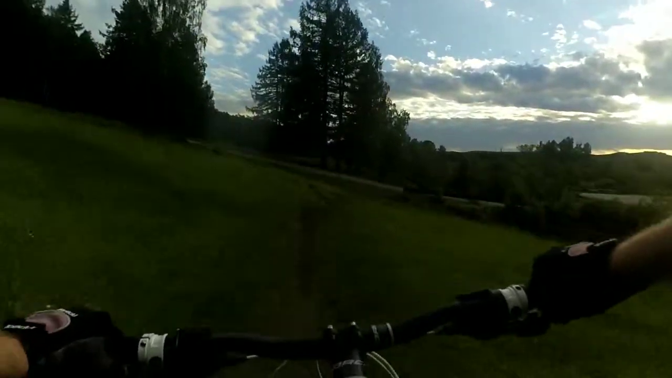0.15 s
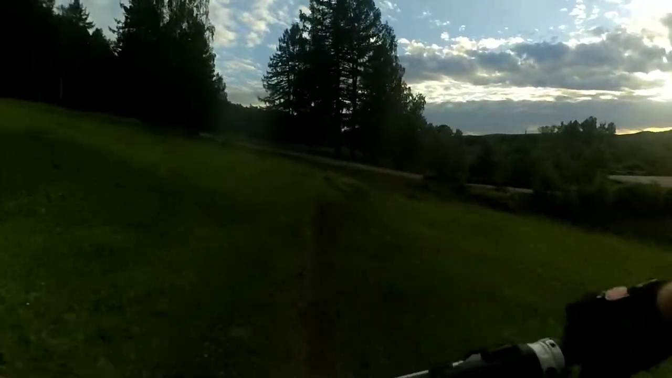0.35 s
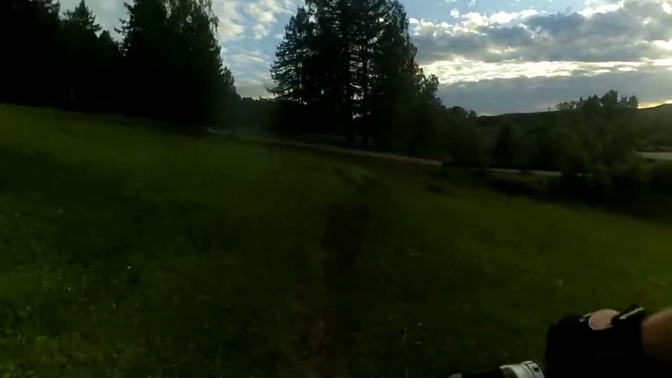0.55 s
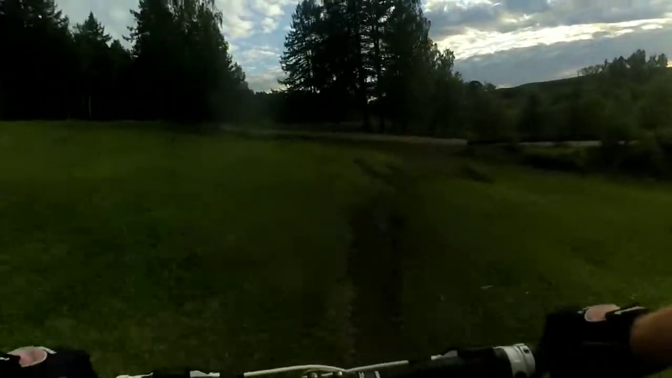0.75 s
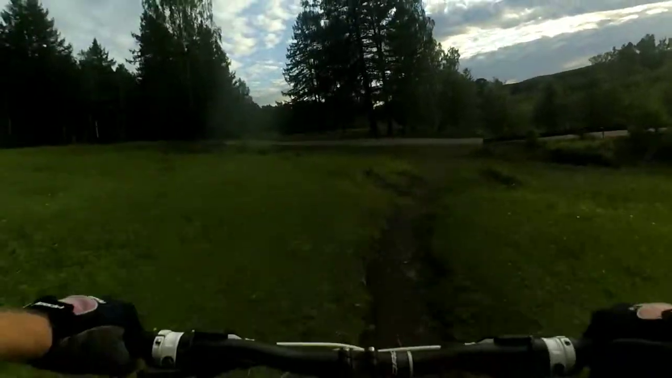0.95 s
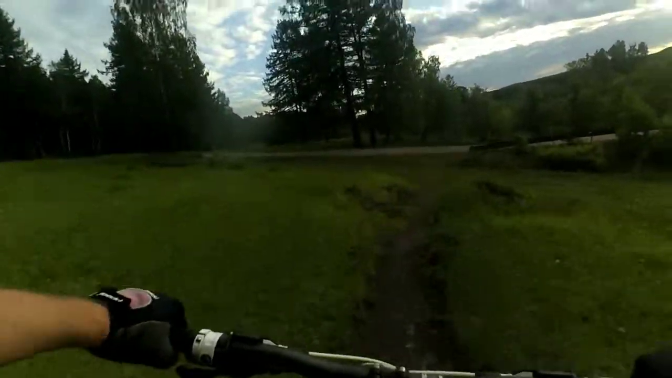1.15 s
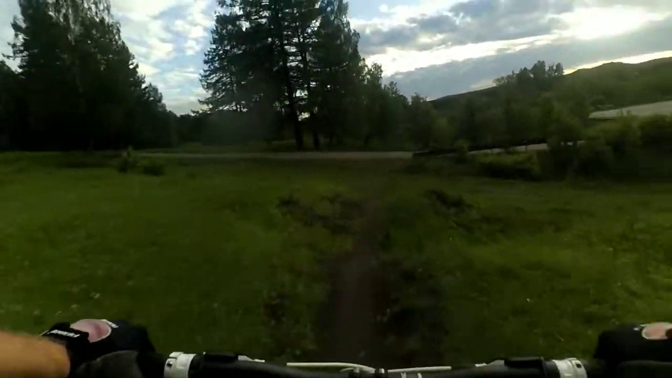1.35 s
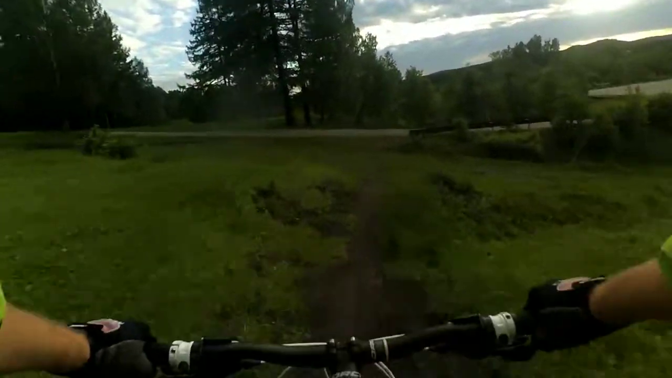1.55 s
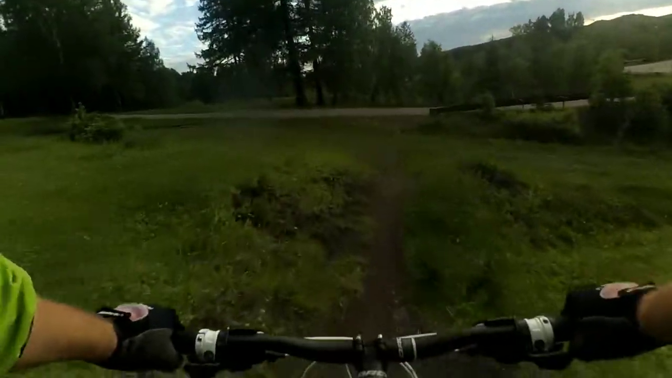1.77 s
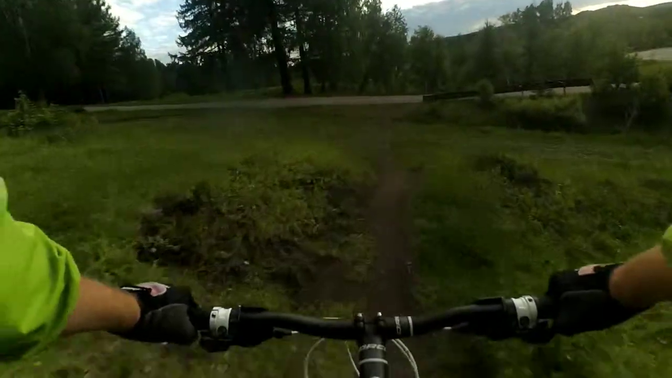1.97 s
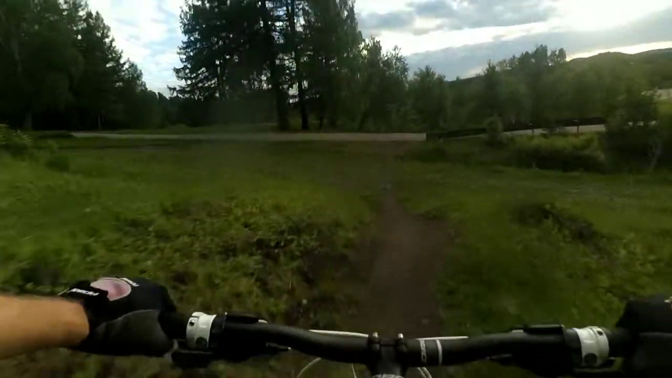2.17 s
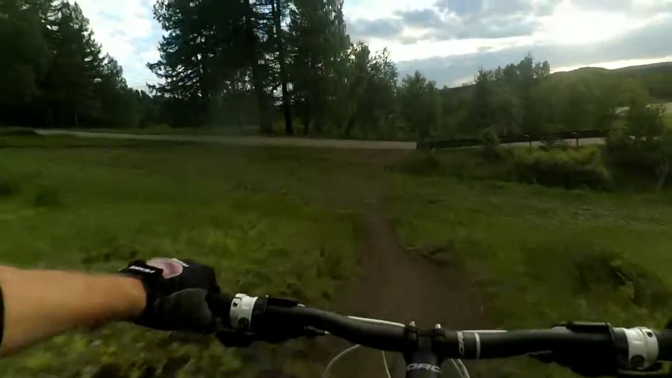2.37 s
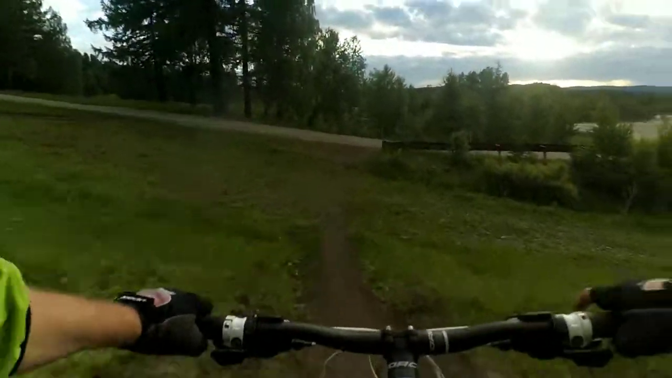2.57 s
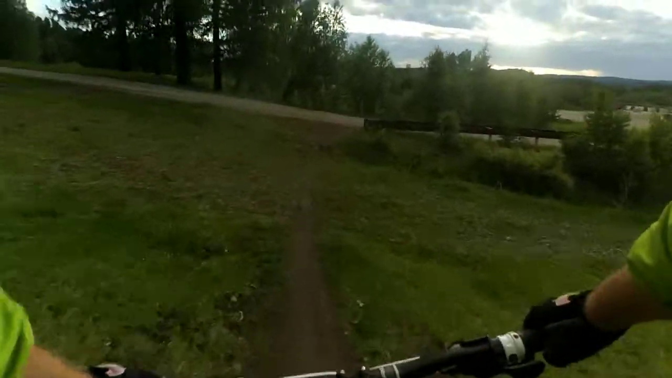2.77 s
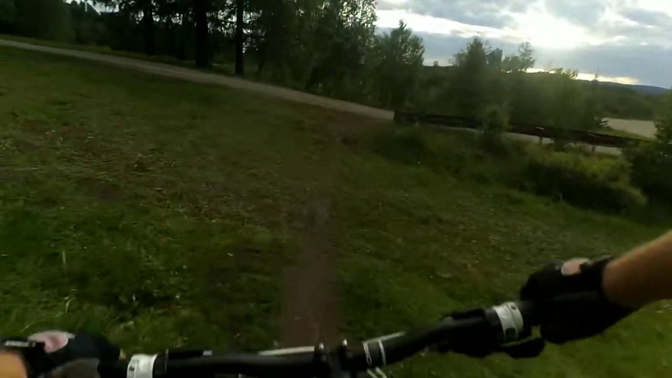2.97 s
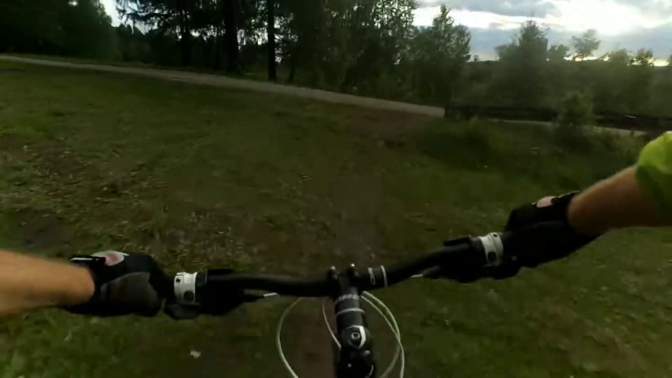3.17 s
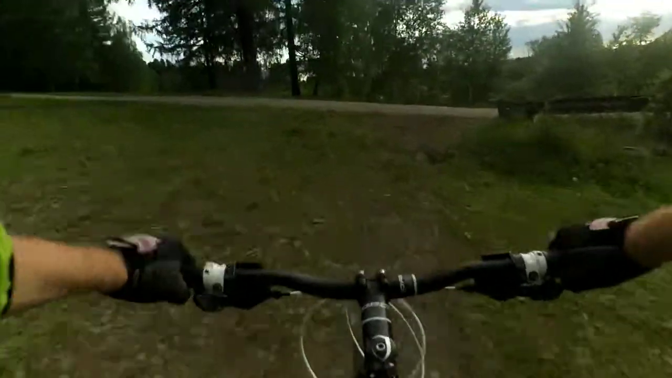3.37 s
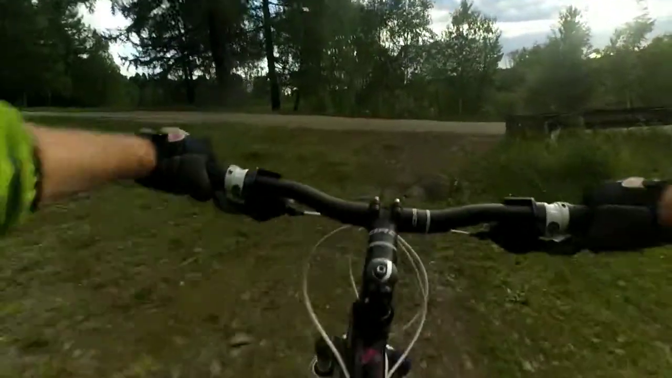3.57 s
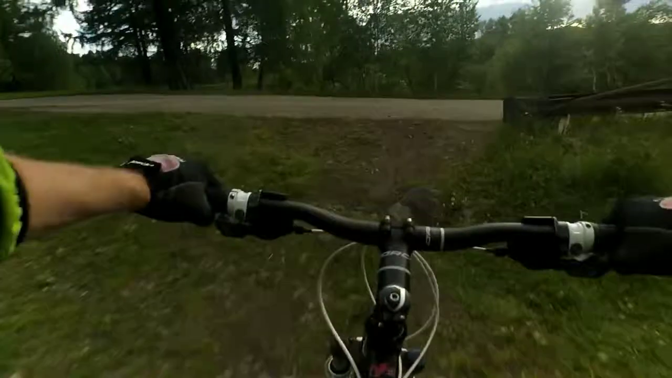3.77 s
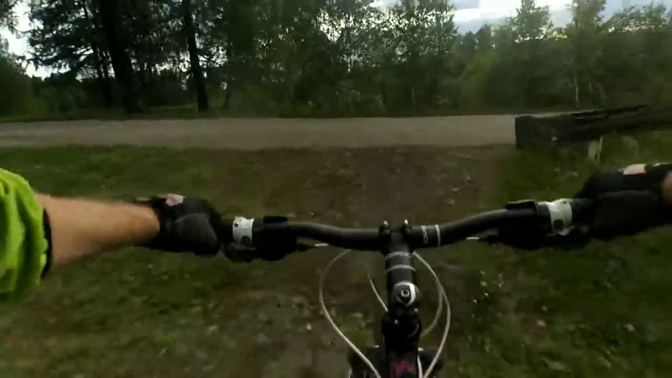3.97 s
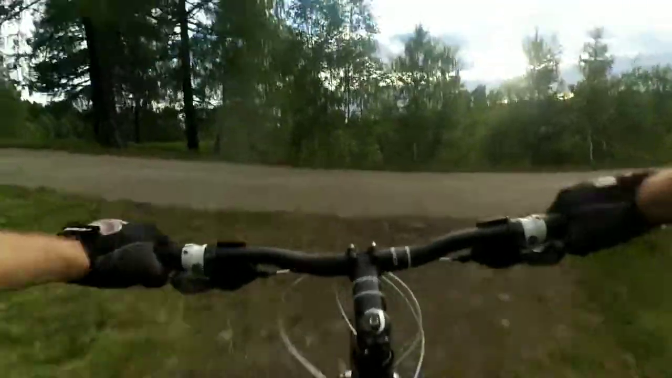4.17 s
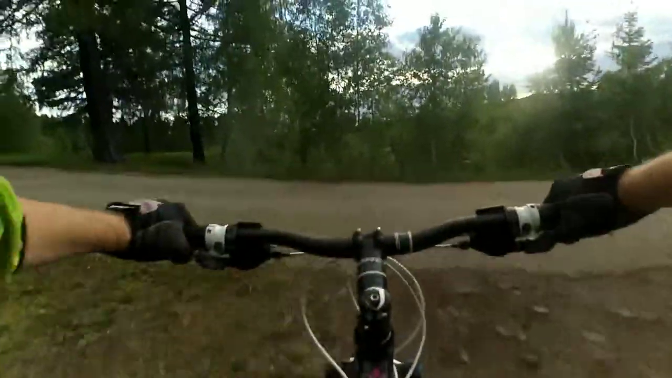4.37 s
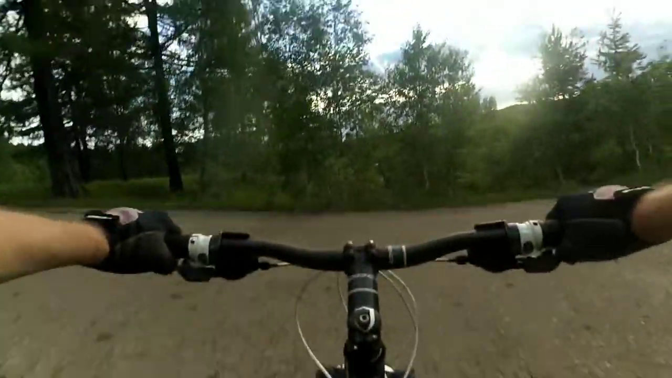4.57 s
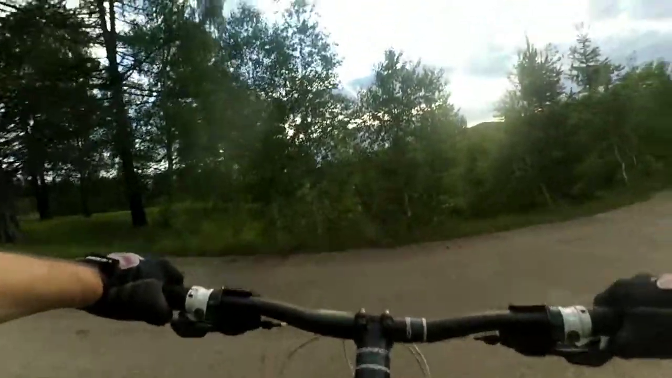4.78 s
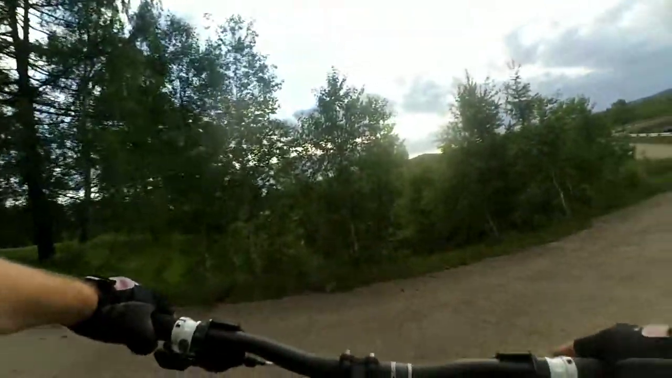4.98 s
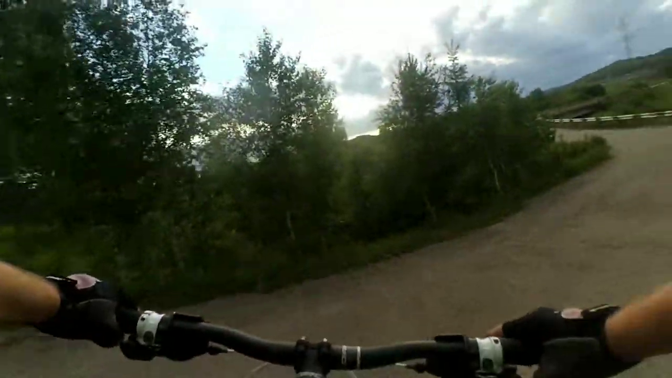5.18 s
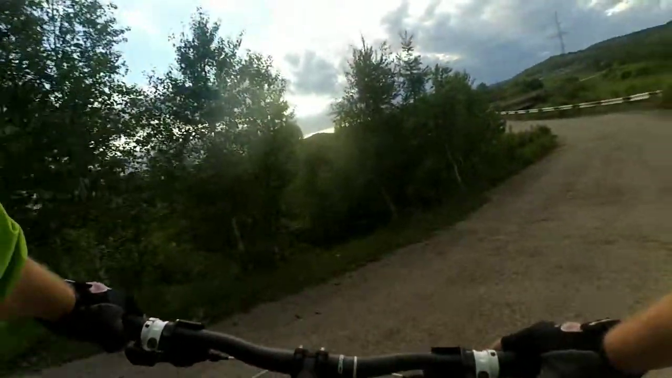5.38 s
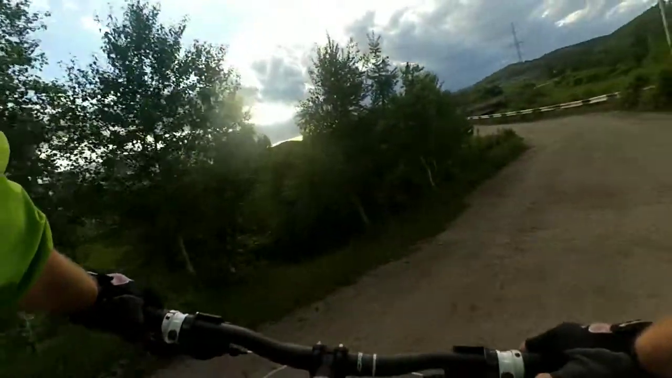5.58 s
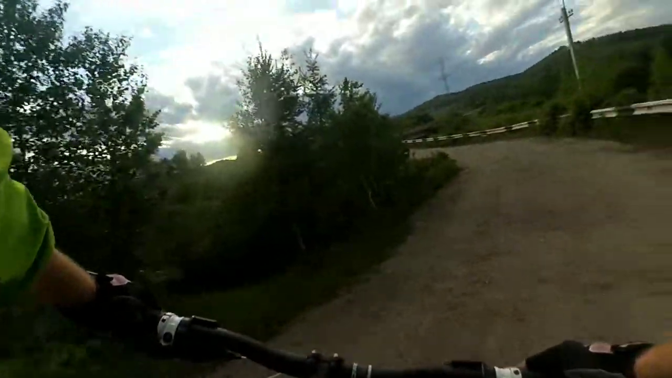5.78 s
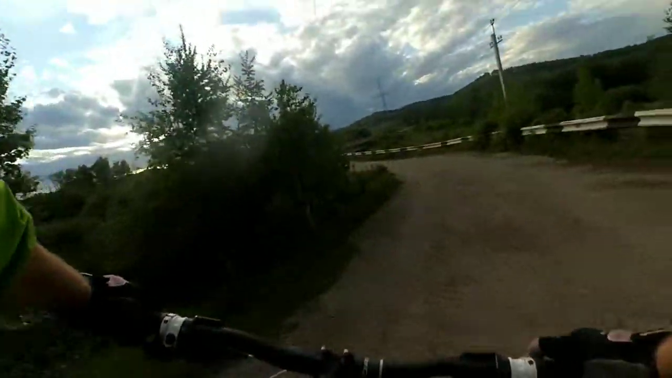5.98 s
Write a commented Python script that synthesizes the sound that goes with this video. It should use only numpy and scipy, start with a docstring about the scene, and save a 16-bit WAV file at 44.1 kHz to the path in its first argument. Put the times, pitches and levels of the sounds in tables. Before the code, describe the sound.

Gusty, thudding wind noise over a clattering bike chain and gritty tyre crunch, hardest around the trail's end, then smooth soft rolling on a dirt road.

```python
"""Bumpy grass trail onto a dirt road: a mountain bike, heard from a microphone on the rider's chest.
Gusts carry eddies past the microphone as warped noise; vortices pop and bumps jolt it.
Chain and cables clatter on the frame as noise bursts with ringing modes; stones tick off as short tones.
Tyres crunch grit as clumped grains, scrub and slide as filtered noise, then roll more smoothly on the
packed road; the freewheel ticks faintly throughout, slowing near the end."""
import sys
import numpy as np
from scipy import signal
from scipy.fft import rfft, irfft, next_fast_len
from scipy.io import wavfile
from scipy.ndimage import uniform_filter1d, map_coordinates

SR = 44100
rng = np.random.default_rng(int(sys.argv[2]) if len(sys.argv) > 2 else 0)


def dump_mix(stems):
    """Bounce the given channels to the path in sys.argv[1] as a 16-bit WAV at rate SR."""
    frames = np.atleast_2d(stems).T  # one column per channel
    limited = np.clip(frames, -1, 1)  # hard clip at full scale
    pcm = np.round(limited * 32767).astype(np.int16)
    wavfile.write(sys.argv[1], SR, pcm)


N = 266011
TIME = np.arange(N) / SR
EDGE_HZ = 15550
# tyre work through grass and grit: [t/s, relative level/dB]
GROUND_ROUGHNESS = [(0.2, -64.5), (0.4, -60.5), (1.1, -61.5), (1.8, -61.5), (1.95, -60.5), (2.3, -57),
                    (2.5, -60), (2.8, -62), (3.2, -54.5), (3.4, -57.5), (3.55, -52), (4.15, -56),
                    (4.4, -51.5), (4.62, -59.5), (4.8, -57), (5.0, -65.5), (5.2, -65.5), (5.4, -68.5)]


def amp(db):
    """Amplitude factor of a level in dB."""
    return 10 ** (np.asarray(db) / 20)


def unit(x):
    """Scales to rms 1."""
    return x / np.sqrt(np.mean(x ** 2) + 1e-20)


def curve(rows, axis=1):
    """One column of a table, joined by straight lines in time."""
    rows = np.asarray(rows)
    return np.interp(TIME, rows[:, 0], rows[:, axis])


def colour(x, points):
    """Filters x by a spectrum drawn in dB on a log-frequency axis."""
    hz, db = np.transpose(points)
    size = next_fast_len(len(x) + 4096)
    f = np.fft.rfftfreq(size, 1 / SR)
    gain = amp(np.interp(np.log(f + 1), np.log(hz), db))
    return irfft(rfft(x, size) * gain, size)[:len(x)]


def wander(per_s, size=N):
    """Bounded random line of rms 1 with per_s new knots a second."""
    knots = np.clip(rng.standard_normal(16384), -2, 2)
    position = np.arange(size) * per_s / SR
    return unit(map_coordinates(knots, [position], order=1, mode="wrap"))


def steady(x, seconds):
    """Evens out the slow level of x, keeping its quick detail."""
    power = abs(uniform_filter1d(x ** 2, max(int(seconds * SR), 8)))
    return x / np.sqrt(power + 1e-12)


def add(mix, s, sound):
    """Adds sound into mix from s seconds on."""
    part = mix[max(round(s * SR), 0):][:len(sound)]
    part += sound[:len(part)]


def swell(start, rise, hold, release):
    """Power, 0 to 1, of something that builds smoothly, holds and dies away."""
    end = start + rise + hold + release
    ramp = np.minimum((TIME - start) / max(rise, .002), (end - TIME) / max(release, .002))
    return np.sin(np.pi / 2 * np.clip(ramp, 0, 1)) ** 4


def frame_ring(x, ring_db):
    """A blow is heard directly and through the short metallic modes of the bike."""
    # ringing of frame and drive: [f/Hz, width/Hz, relative level/dB]
    modes = [(3206, 230, 1.5), (4110, 35, 4), (5040, 50, 7), (5490, 56, 3), (5800, 57, -26),
             (6470, 99, -12), (7460, 45, -6), (9100, 48, -10), (8850, 78, 0), (9700, 120, -9.5),
             (11050, 95, -8), (11550, 72, -21), (12680, 90, -13)]
    t = np.arange(4096) / SR
    ring = np.zeros(len(t))
    for hz, width_hz, db in modes:
        decay = np.sqrt(width_hz) * np.exp(-np.pi * width_hz * t)
        ring += amp(db) * decay * np.sin(2 * np.pi * (hz * t + rng.random()))
    return x + amp(ring_db) * signal.fftconvolve(x, ring / np.linalg.norm(ring))[:len(x)]


def airflow(draught_db=0.0, draught_fineness=1.03, calm_rumble_db=-8.0, rumble_slope=0.64):
    """Gusts add in power to the draught; gives roar/dB, rumble/dB and fineness of the eddies."""
    # steady draught between gusts: [t/s, level/dB]
    draught = [(0, -51), (3.05, -49), (3.4, -42.5), (4.3, -41.5), (5.0, -47), (5.4, -61), (5.75, -81),
               (5.88, -54.5), (6.03, -54)]
    # gusts: [start/s, rise/s, hold/s, release/s, roar/dB, rumble/dB, fineness as eddy pitch factor]
    gusts = [(0.0, .007, 0.018, .16, -18, -21.5, 1), (0.121, 0.034, 0.15, 0.077, -25.5, -26.5, 1.21),
             (0.33, 0.073, 0.35, 0.064, -19.5, -18, 1.116), (0.555, 0.049, 0.051, .08, -20, -18.5, 0.95),
             (0.767, 0.037, .18, .1, -17.5, -15, 0.96), (0.831, 0.056, 0.022, 0.05, -22, -17, 0.97),
             (1.029, 0.039, .03, .12, -16.5, -15.5, 0.97), (1.0, 0.097, .3, 0.081, -19.5, -18, 1.015),
             (1.436, 0.024, .015, 0.07, -20.5, -23.5, 1.0), (1.63, .12, 0.064, .11, -38, -34, 1.18),
             (1.775, .235, .035, .16, -22.5, -27.5, 1.05), (2.132, 0.093, 0.031, 0.061, -23.5, -28.5, 1.04),
             (2.375, 0.077, 0.14, 0.092, -27, -25, 0.94), (2.446, 0.052, .012, .12, -19.5, -23.5, 1.077),
             (2.658, 0.038, 0.0051, 0.065, -35, -28, 1.66), (2.759, 0.054, 0.037, .08, -37.5, -31.5, 1.16),
             (3.396, .085, 0.01998, 0.045, -25, -30, 1.22), (3.442, 0.068, 0.042, .12, -17, -30, 1.14),
             (3.6, .045, .07, .14, -24, -27, 1.033), (3.8, .045, .05, .13, -24, -23.5, .92),
             (3.9, 0.071, .02, 0.24, -21.5, -26, .87), (4.117, 0.083, 0.0098, 0.065, -32.5, -31, 1.16),
             (4.368, 0.058, 0.0049, 0.053, -33, -32.5, 1.26), (4.462, .05, 0.0054, 0.046, -34, -28.5, 1.23),
             (4.552, 0.039, .12, .16, -28.5, -32.5, 1.0), (4.799, 0.085, 0.0099, .24, -30, -38.5, .95),
             (5.093, .11, 0.036, 0.1, -39.5, -47, 1.05)]
    calm_db = curve(draught) + draught_db
    roar = amp(calm_db) ** 2
    low = amp(calm_rumble_db + rumble_slope * calm_db) ** 2
    fine = draught_fineness * roar
    for start, rise, hold, release, roar_db, rumble_db, fineness in gusts:
        gust = swell(start, rise, hold, release)
        gust_roar = gust * amp(roar_db) ** 2
        roar = roar + gust_roar
        fine = fine + gust_roar * fineness
        # large eddies come sooner and linger longer than the roar
        low = low + np.sqrt(gust) * amp(rumble_db) ** 2
    return 10 * np.log10(roar), 10 * np.log10(low), fine / roar


def sway(rumble_db, level_db=-9.0, slope=0.57):
    """Deep, slow heaving of the air as the rider is shaken; it grows with the rumble, but less."""
    # [f/Hz, relative density/dB]
    spectrum = [(2, -28), (6, -1), (12, 2.5), (22, 10), (38, -10), (60, -9), (120, -26), (400, -84),
                (1500, -110)]
    heave = steady(colour(rng.standard_normal(N), spectrum), 0.135)
    return amp(slope * rumble_db + level_db) * heave


def rumble(rumble_db, level_db=0.0):
    """Large eddies shed by the arms and handlebar thud against the microphone."""
    # [f/Hz, relative density/dB]
    spectrum = [(15, -40), (40, -2.5), (75, -2), (115, -5.5), (160, -9), (260, -16.5), (600, -34),
                (1500, -101)]
    return amp(rumble_db + level_db) * steady(colour(rng.standard_normal(N), spectrum), 0.0755)


def wind(gust_db, fineness, level_db=0.0, full_db=-16, db_per_octave=12.0, vortices_per_s=330,
         lumpy_db=2.0, lumps_per_s=170, flutter_octaves=.16, flutters_per_s=70,
         early_share=0.59, late_share=0.7, buffet_db=0.59, buffets_per_s=35):
    """A field of eddies passes the microphone: faster air is louder and brighter; rates are at speed 1."""
    # eddies at speed 1: [f/Hz, relative density/dB]
    eddies = [(30, -57), (100, -6), (220, -0.5), (600, -3), (950, -9), (1400, -18.5), (2100, -30),
              (3200, -41.5), (6000, -53), (14000, -59.5)]
    size = 2 * N
    air_db = gust_db + buffet_db * wander(buffets_per_s)
    flutter = 2 ** (flutter_octaves * wander(flutters_per_s))
    air_speed = np.clip(2 ** ((air_db - full_db) / db_per_octave), .27, 1.25)
    position = np.cumsum(air_speed * fineness * flutter)
    # each vortex core is a brief dip of pressure, amid a lumpy wash of smaller eddies
    cores = -1.0 * (rng.random(size) < vortices_per_s / SR) * np.sqrt(rng.exponential(1, size))
    wash = rng.standard_normal(size) * amp(lumpy_db * wander(lumps_per_s, size=size))

    def carry(field):
        """Reads the coloured field at the position the air has reached."""
        return map_coordinates(colour(unit(field - field.mean()), eddies), [position], order=3, mode="wrap")

    # cores gain on the wash after the early gusts
    share = np.clip(np.interp(TIME, [1.4, 1.9], [early_share, late_share]), 0, 1)
    passing = (np.sqrt(share) * carry(cores) + np.sqrt(1 - share) * carry(wash)) * flutter
    return amp(air_db + level_db) * steady(passing, 0.074)


def pops(level_db=-2.0, rim=3.4):
    """A strong vortex sucks sharply at the microphone, inside a wider rim of raised pressure."""
    # strongest vortices: [t/s, relative peak/dB, half length/s]
    vortices = [(0.014, -4.5, 0.00044), (0.141, -8.5, 0.00036), (0.277, -10.5, 0.00033),
                (0.444, -2, 0.00032), (0.608, -3.5, 0.0011), (0.7308, 1, 0.00029), (1.0136, -4, 0.00047),
                (1.0751, -1, 0.00041), (1.397, -2.5, 0.00034), (2.004, -14, 0.0005), (2.2165, -8, 0.00037),
                (2.271, -10.5, 0.00046), (2.4887, -17, 0.0004), (2.595, -12.5, 0.00047),
                (2.709, -20, 0.00097), (3.4878, -2, 0.00028), (3.5347, -4, 0.0006), (3.6469, -1.5, 0.00044),
                (3.8403, -10.5, 0.00038), (3.997, -6, 0.00079), (4.0113, 0, 0.00035), (4.0994, -8, 0.00085),
                (4.602, -11, 0.00079), (4.875, -14, 0.00088), (4.899, -10.5, 0.0014), (5.135, -27, 0.0011),
                (5.175, -24.5, 0.0011)]
    out, t = np.zeros(N), np.arange(-512, 512) / SR
    for s, db, half in vortices:
        u = t / half
        core = np.exp(-u ** 2 / 2)
        raised = np.exp(-(u / rim) ** 2 / 2) / rim
        add(out, s + t[0], amp(db + level_db) * (raised - core) / (1 - 1 / rim))
    return out


def jolts(level_db=-8.0):
    """Each bump pulls the pressure down and pushes it back up."""
    # bumps: [t/s, relative peak/dB, half length/s]
    bumps = [(0.095, 0, 0.0028), (0.247, -1, 0.0049), (0.411, -4, 0.0033), (1.13, -11, 0.00068),
             (1.753, -9, 0.0076), (2.82, -15, 0.0037), (3.424, -3.5, 0.0029), (3.761, -14, 0.0033),
             (4.2, 1, .01), (4.731, -16, 0.0022), (5.048, -20, 0.0041), (5.285, -19, 0.0053)]
    out = np.zeros(N)
    for s, db, half in bumps:
        u = (TIME - s) / half
        out += amp(db + level_db) * u * np.exp((1 - u ** 2) / 2)
    return out


def freewheel(level_db=-74, uneven_db=3, t60_s=.026, ring_db=-1):
    """Pawls drop faintly over the ratchet, slowing a little as the bike coasts onto the road."""
    drops_per_s = np.interp(TIME, [4.8, 5.5, 6.0], [33.4, 32.3, 29])
    count = np.cumsum(drops_per_s) / SR
    drops = np.diff(np.floor(count), prepend=0) * amp(uneven_db * rng.standard_normal(N))
    t = np.arange(1024) / SR
    clicks = signal.fftconvolve(drops, amp(-60 * t / t60_s))[:N] * rng.standard_normal(N)
    spectrum = [(1500, -10), (4000, -10), (7000, -13), (10000, -4), (12000, -5), (15000, -10)]
    return amp(level_db) * unit(colour(frame_ring(clicks, ring_db=ring_db), spectrum))


def rolling(level_db=-52):
    """The low, even drone of the turning tyres, as filtered noise."""
    # [f/Hz, relative density/dB]
    spectrum = [(40, 16), (90, -24), (160, -31), (250, -17), (350, 2.5), (450, -11), (600, -10), (900, -16),
                (2000, -18.5), (4000, -45), (6000, -55), (15000, -30)]
    return amp(level_db) * unit(colour(rng.standard_normal(N), spectrum))


def stones(level_db=-5.0, t60_s=0.0062):
    """A stone flicked at the bike gives one dry tick: a few cycles of its own pitch and a snap."""
    # stones: [t/s, relative peak/dB, f/Hz, noise snap per unit of tone]
    hits = [(0.62, -18, 2620, 0.83), (2.7601, -20.5, 4340, 2.54), (3.846, -22, 2588, 1.01),
            (3.892, -15.5, 2570, 1.8), (4.022, -9, 3086, 0.87), (4.6094, -24, 2822, 1.14),
            (5.566, -41.5, 3890, 2.1), (5.6244, -39, 2520, 2.4), (5.659, -36, 3000, 0.84),
            (5.679, -41, 3780, 2.1)]
    spectrum = [(500, -10), (2500, 0.0), (6000, -1.5), (9000, -12), (15000, -35)]
    out, t = np.zeros(N), np.arange(2048) / SR
    envelope = amp(-60 * t / t60_s) * (1 - np.exp(-t / 0.00023))
    for s, db, hz, snap in hits:
        tick = (np.sin(2 * np.pi * hz * t) + snap * rng.standard_normal(len(t))) * envelope
        tick = colour(tick, spectrum)
        add(out, s + 0.000963, amp(db + level_db) * tick / abs(tick).max())
    return out


def clack(bright_db, t60_s=0.047, links_per_s=2500, rise_s=0.00083, hiss=0.47, spot_db=7.0):
    """Chain links land in a quick, dying clatter that rings the frame."""
    # [f/Hz, relative density/dB]
    spectrum = [(400, -15), (1500, -15), (2400, -6.5), (3400, 6), (5000, -2.5), (7000, 1.5), (10000, -3),
                (12000, -10.5), (15500, -6.5)]
    t = np.arange(4096) / SR
    links = rng.standard_normal(len(t)) * (hiss + (rng.random(len(t)) < links_per_s / SR))
    blow = links * amp(-60 * t / t60_s) * (1 - np.exp(-t / rise_s))
    # each blow lands on another spot, which favours some bands over others
    spot = np.transpose([np.geomspace(2000, 15000, num=16), spot_db * rng.standard_normal(16)])
    sound = colour(frame_ring(blow, ring_db=-8.5), spectrum)
    sound = colour(sound, spot)
    sound = colour(sound, [(3500, 0), (11000, bright_db)])
    return sound / np.sqrt(np.mean(sound[:256] ** 2))


def rattle(count=18, over_grit_db=6.5, spread_db=0.5, bright_db=1.0, tone_spread_db=6, trail_end_s=4.8):
    """Small bumps keep the chain rattling all down the trail, louder where the ground is rough."""
    out, grit_db = np.zeros(N), curve(GROUND_ROUGHNESS)
    times = (np.arange(count) + rng.random(count)) * trail_end_s / count
    for s, (force, tone) in zip(times, rng.uniform(-0.9, 1, (count, 2))):
        db = np.interp(s, TIME, grit_db) + over_grit_db + spread_db * force
        add(out, s, amp(db) * clack(bright_db + tone_spread_db * tone))
    return out


def clacks(level_db=-5.0):
    """Big bumps throw chain and cables hard against the frame."""
    # hardest slaps: [t/s, relative level/dB, treble tilt/dB]
    slaps = [(0.0828, -43.5, -7), (0.337, -44, 8), (0.367, -39.5, 6), (0.4259, -36.5, -8),
             (0.6205, -35.5, -2), (0.6576, -36, 2), (0.7555, -37, 0.0), (0.827, -39, -1),
             (0.8903, -39.5, 2), (1.089, -42.5, 15), (1.223, -43.5, -8), (1.487, -44, -6),
             (1.719, -41.5, 3), (1.7804, -47, 3), (1.9782, -41.5, 0.0), (2.143, -43, 12), (2.2819, -43, -2),
             (2.321, -36.5, -8), (2.591, -35, 2), (2.657, -45, 8), (2.799, -42.5, 3), (3.0638, -45, 9),
             (3.1736, -42.5, 16), (3.5125, -32, 9), (3.6173, -33.5, 0), (3.6483, -28, 9),
             (3.683, -32.5, -5), (3.7049, -39.5, 7), (3.7616, -35, 8), (3.7851, -32.5, -11),
             (3.8919, -33, 5), (4.039, -38, -5), (4.2058, -36, 4), (4.2194, -31, 8), (4.2865, -37.5, 11),
             (4.3148, -37, -3), (4.3304, -38, -6), (4.402, -35.5, 6), (4.4293, -40.5, 5),
             (4.5218, -38.5, -5), (4.709, -42, 14), (4.7412, -38.5, 8), (5.006, -47.5, 2),
             (5.138, -43.5, 1)]
    out = np.zeros(N)
    for s, db, bright_db in slaps:
        add(out, s, amp(db + level_db) * clack(bright_db))
    return out


def steering(level_db=0.0, clump_db=2.5, clumps_per_s=110):
    """Leant into a turn, the tyres slide a little and hiss softly on the dirt."""
    # slides: [start/s, rise/s, hold/s, release/s, level/dB]
    slides = [(2.999, .15, 0.049, 0.15, -45.5), (3.55, 0.099, 0.073, .2, -51),
              (5.013, .17, 0.033, 0.15, -50.5), (5.58, 0.035, 0.46, .15, -57)]
    # rubber sliding sideways on dirt: [f/Hz, relative density/dB]
    spectrum = [(200, 15), (350, 14.5), (550, 9.5), (900, -1), (1250, 0), (1500, 6.5), (1900, 1),
                (2400, -12), (3100, -4), (4100, -6), (5000, -21.5), (12000, -25)]
    power = np.zeros(N)
    for start, rise, hold, release, db in slides:
        power += swell(start, rise, hold, release) * amp(db + level_db) ** 2
    hiss = rng.standard_normal(N) * amp(clump_db * wander(clumps_per_s))
    return np.sqrt(power) * unit(colour(hiss, spectrum))


def tyres(grit_db=5.5, scrub_db=10.5, grains_per_s=1300, spread_db=13.0, grain_db=5.0,
          clump_db=2.5, clumps_per_s=110):
    """Knobs crush grit in clumps of tiny cracks, over the softer scrub of rubber on dirt."""
    # both: [f/Hz, relative density/dB]
    grit_spectrum = [(300, 17), (900, 4.5), (1600, 4.5), (2400, 2), (3300, 1.5), (5000, -12.5), (7000, -3),
                     (8000, -4), (9600, -2), (11500, -19.5), (15000, -29)]
    scrub_spectrum = [(200, 3), (340, 23), (500, 12.5), (700, 8.5), (950, 3), (1250, 7.5), (1550, 1),
                      (1850, 3.5), (2300, 1.5), (3100, 1), (4100, -2), (5000, -3.5), (12000, -12)]
    sizes = amp(spread_db * np.minimum(rng.exponential(1, N), 3.6)) * rng.choice([-1, 1], N)
    grains = unit(sizes * (rng.random(N) < grains_per_s / SR))
    # the packed road is smoother than the trail
    rough = np.interp(TIME, [4.8, 5.3], [1, .45])
    clumps = amp(clump_db * rough * wander(clumps_per_s))
    cracks = amp(grain_db) * rough * grains + rng.standard_normal(N)
    crunch = frame_ring(steady(cracks, 0.31) * clumps, ring_db=-7.0)
    work_db = curve(GROUND_ROUGHNESS)
    grit = amp(work_db + grit_db) * unit(colour(crunch, grit_spectrum))
    rubbing = (rng.standard_normal(N) + .5 * rough * grains[::-1]) * clumps
    scrub = amp(work_db + scrub_db) * unit(colour(rubbing, scrub_spectrum))
    # scrub against grit: weaker on grass, full on loose dirt, weakest on the packed road
    loose = np.interp(TIME, [2.55, 2.95, 4.6, 4.9], [0.83, 1, 0.93, 0.44])
    return grit + loose * scrub


def scene():
    """Everything reaches one microphone, so both channels are alike."""
    gust_db, rumble_db, fineness = airflow()
    air = wind(gust_db, fineness) + pops() + rumble(rumble_db) + sway(rumble_db) + jolts()
    bike = tyres() + steering() + rolling() + clacks() + rattle() + stones() + freewheel()
    return np.array([air + bike, air + bike])


def record(dry):
    """The strongest peaks are softly squashed; then a low-pass sets the band limit."""
    squashed = dry / (1 + (dry / .92) ** 6) ** (1 / 6)
    lowpass = signal.firwin(511, EDGE_HZ, window=("kaiser", 9), fs=SR)
    return signal.oaconvolve(squashed, lowpass[None], "same")


dry = scene()
out = record(dry)
dump_mix(out)
```